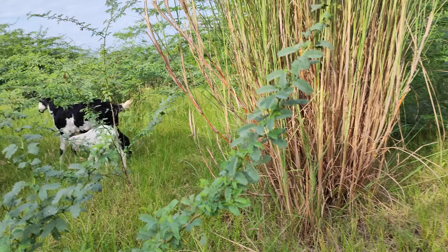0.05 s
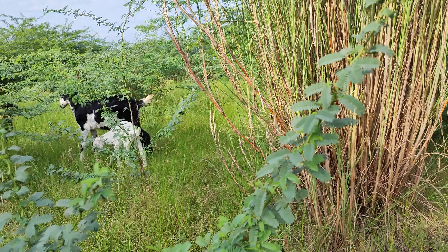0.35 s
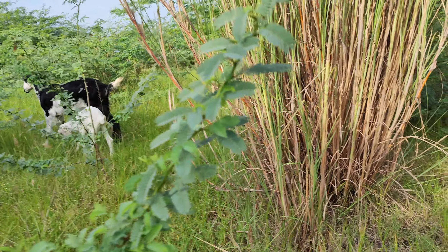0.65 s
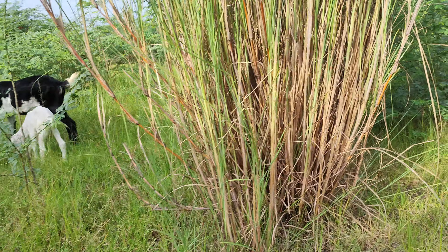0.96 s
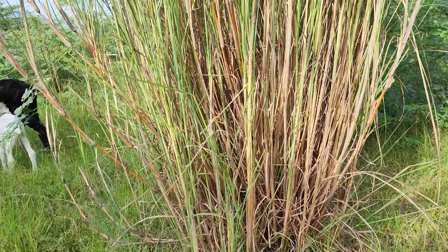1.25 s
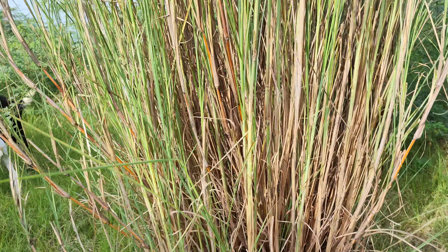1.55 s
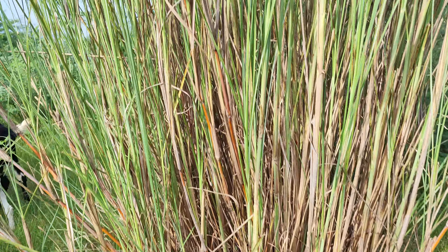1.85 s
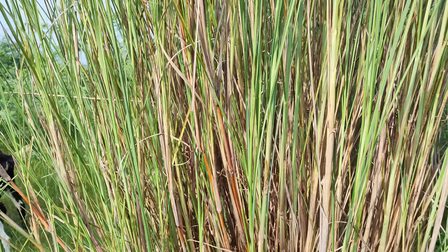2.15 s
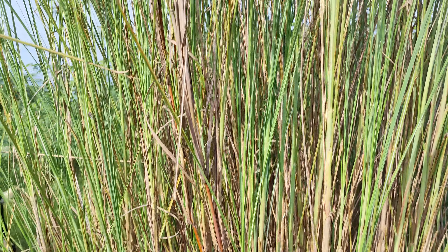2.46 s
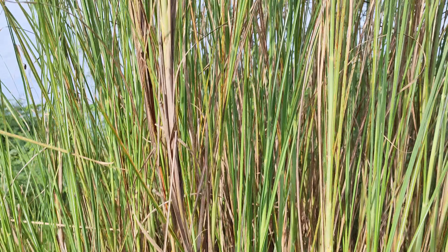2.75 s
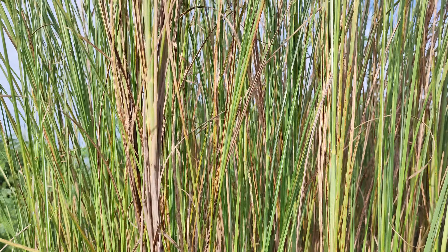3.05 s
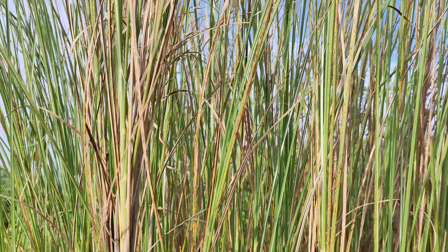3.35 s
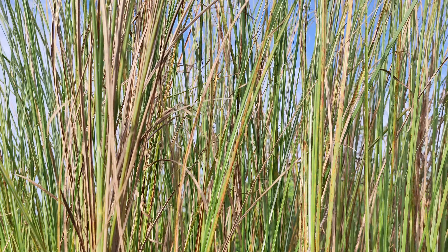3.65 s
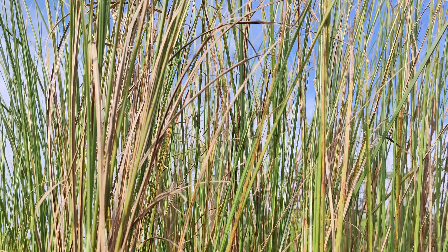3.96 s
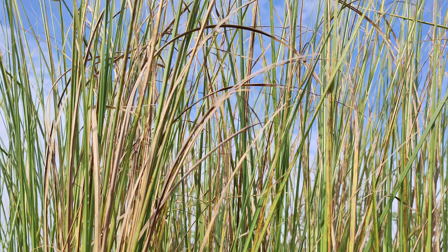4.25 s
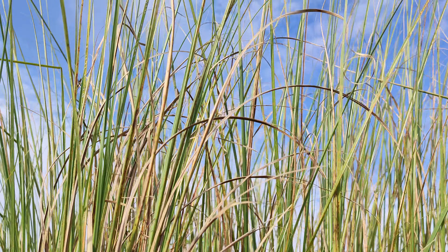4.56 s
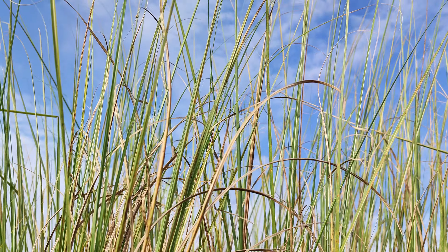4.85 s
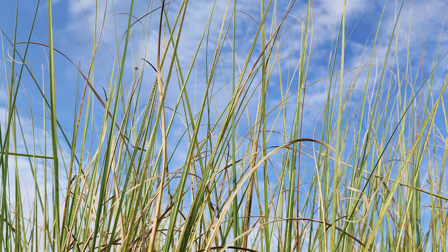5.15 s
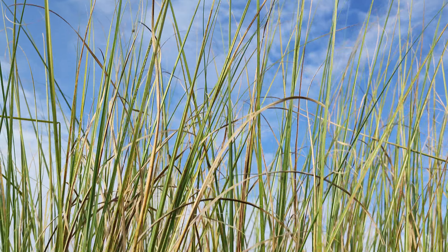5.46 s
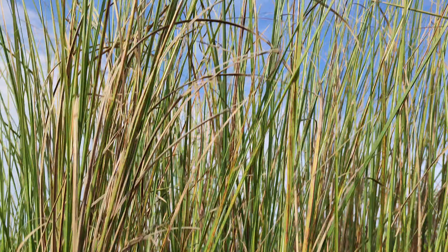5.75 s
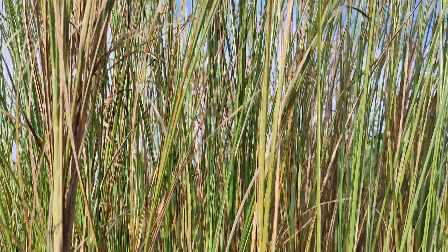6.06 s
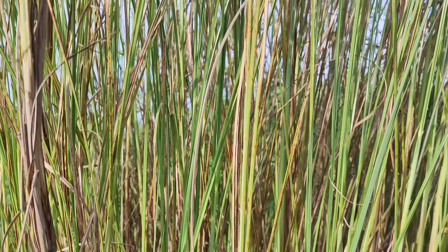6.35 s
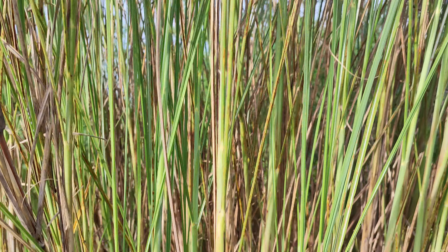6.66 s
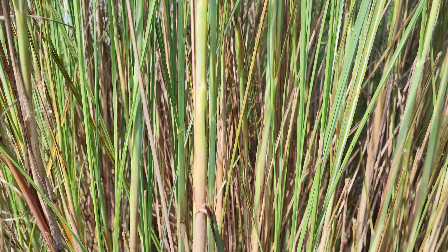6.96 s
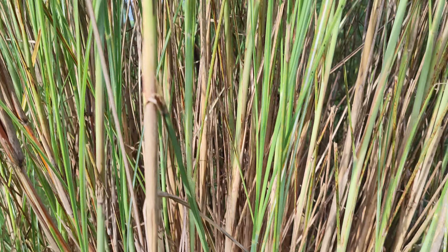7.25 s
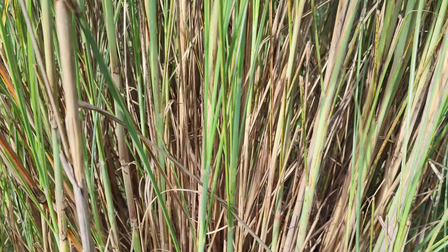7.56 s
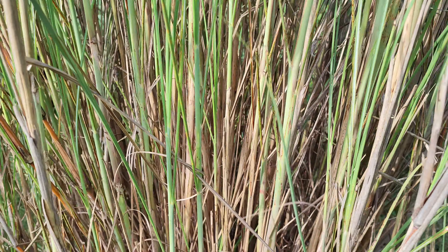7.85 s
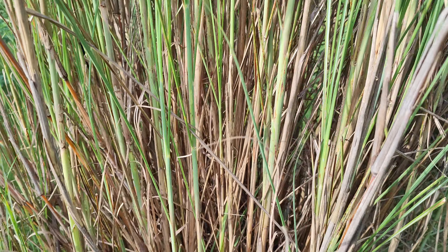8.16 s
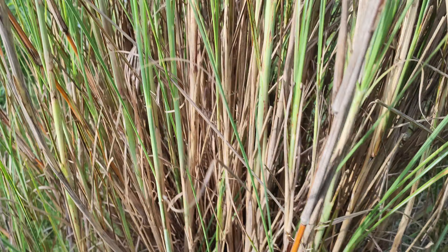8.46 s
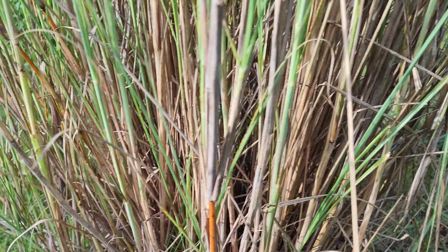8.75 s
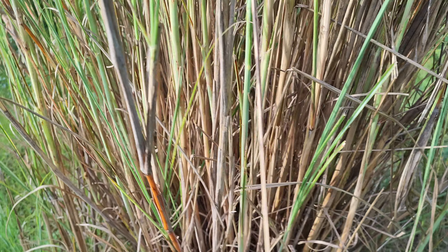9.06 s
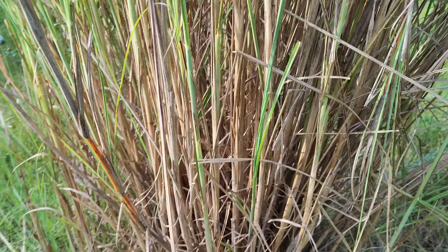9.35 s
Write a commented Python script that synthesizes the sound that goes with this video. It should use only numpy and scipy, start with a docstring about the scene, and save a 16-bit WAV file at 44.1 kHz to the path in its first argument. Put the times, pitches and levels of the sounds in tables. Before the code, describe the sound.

Crickets chirp over a high insect hiss and distant birds as steps swish through tall grass, with one loud bump on the microphone.

```python
"""A slow walk round a clump of tall grass in a field, microphone in hand. From the start, crickets chirp
with their wings over a far insect chorus, distant birds and a low rumble of air. For two seconds or so,
steps swish through the grass and snap dry stalks. Near 3 s a bird sings a climbing row of notes. At 4.6 s
a hand bumps the microphone's case hard enough to overload it. From 6.5 s the steps return, and just
after 7 s the hand bumps the case again, more lightly."""
import sys
import numpy as np
from scipy import signal
from scipy.fft import rfft, irfft, next_fast_len
from scipy.io import wavfile

SR = 44100
rng = np.random.default_rng(int(sys.argv[2]) if len(sys.argv) > 2 else 0)


def unload_wav(signal):
    """Save mono or channel-first audio to the path in sys.argv[1] as 16-bit WAV at rate SR, clipped to [-1, 1]."""
    wavfile.write(
        sys.argv[1],
        SR,
        np.round(np.clip(np.atleast_2d(signal).T, -1, 1) * 32767).astype(np.int16),
    )


N = 423801
TIME = np.arange(N) / SR

# Strides through the grass: peak t/s, length/s, swish level/dB, straw level/dB (before straw_gain_db)
STRIDES = [(0.605, 0.05, -58.5, -80), (0.727, 0.083, -52.5, -60.5), (0.92, 0.074, -63, -70),
           (1.325, 0.064, -56.5, -66.5), (1.422, 0.057, -50.5, -63.5), (1.893, 0.27, -71, -76),
           (2.239, 0.054, -58, -65), (6.527, 0.13, -68, -75.5), (7.5, 0.078, -62, -66.5),
           (8.059, 0.096, -73, -74.5), (8.318, 0.026, -58.5, -79), (8.518, 0.13, -60.5, -67),
           (8.8, 0.068, -72, -71), (9.172, 0.079, -60.5, -63.5), (9.457, 0.19, -65.5, -73.5)]
# Tone of soft blades swishing: f/Hz, level/dB
SWISH_TONE = [(200, -8.5), (450, -10), (800, -7), (1250, -5.5), (1700, 1.5), (2100, 1), (3000, -5),
              (5000, -28)]
# Tone of dry straw crackling: f/Hz, level/dB
STRAW_TONE = [(1500, -28), (2600, -8.5), (3800, -0.5), (4800, -0.5), (7500, -6)]
# Narrow resonances (ringing tones) in the rustle, one for each pitch in resonance_hz: level/dB
RESONANCE_LEVELS = (-44.5, -29.5, -37, -39.5)


def steps(straw_gain_db=11, tick_db=-12.5, resonance_hz=(1450, 1734, 2680, 3850), ring_s=0.0057):
    """Each step swells and dies away, brushing soft blades and crushing dry straw."""
    swish_power, straw_power = np.zeros((2, N))
    for s, length, swish_db, straw_db in STRIDES:
        rise_s, fall_s = 1.12 * length, 0.96 * length
        from_peak = np.maximum((s - TIME) / rise_s, (TIME - s) / fall_s)
        swell = np.exp(-np.minimum(from_peak, 10) ** 1.2)
        swish_power += (swell * from_db(swish_db)) ** 2   # overlapping rustles add in power
        straw_power += (swell * from_db(straw_db + straw_gain_db)) ** 2
    swish = wide_noise(SWISH_TONE, grain_db=3)
    straw = wide_noise(STRAW_TONE, grain_db=1) + from_db(tick_db) * fibre_ticks()
    rustle = np.sqrt(swish_power) * swish + np.sqrt(straw_power) * straw
    # narrow resonances colour the rustle, the strongest near 1.7 kHz
    resonances = sum(from_db(db) * ring(rustle, hz, ring_s) * (1 + 0.61 * drift(13))
                     for hz, db in zip(resonance_hz, RESONANCE_LEVELS))
    flutter = from_db(1.4 * drift(90))
    return (rustle + resonances) * pan(-0.8) * flutter


def fibre_ticks(per_s=220, spread_db=3):
    """Single dry fibres give way in tiny clicks of uneven size, each from its own side."""
    breaks = rng.random(N) < per_s / SR
    sizes = from_db(spread_db * np.minimum(rng.exponential(1, N), 3))
    clicks = breaks * sizes * pan(4 * rng.standard_normal(N))
    return rms_one(ring(clicks, 2400, 0.0011) - ring(clicks, 4730, 0.00065))


# Dry stalks breaking: t/s, relative level/dB, ring f/Hz, left over right/dB
STALK_BREAKS = [(0.568, -36, 1650, -1.5), (.718, -36, 3750, -9), (.855, -29, 3070, -1),
                (1.263, -31, 3200, -1), (1.419, -36, 1630, -2), (2.091, -39, 5500, -2),
                (3.165, -47, 3780, 6), (3.2435, -44, 4100, 8), (7.1824, -31, 3750, -2),
                (7.859, -47.5, 2427, 0), (9.222, -35.5, 7020, 1)]


def stalk_snaps(crack_s=0.0022, ring_s=0.0065, crack_db=-11.5, ring_db=-22, splinter_db=-0.5):
    """A stalk cracks, then its last fibres splinter; both bursts ring briefly in the hollow stem."""
    out, t = np.zeros((2, N)), TIME[:SR // 40]
    for s, db, hz, side_db in STALK_BREAKS:
        splinter_s = 0.0055 * (.5 + rng.random())
        for late_s, weaker_db in ((0, 0), (splinter_s, splinter_db)):
            burst = rng.standard_normal(len(t)) * np.exp(-t / crack_s)
            snap = from_db(crack_db) * burst + from_db(ring_db) * ring(burst, hz, ring_s)
            add(out, s + late_s, from_db(db + weaker_db) * pan(side_db) * snap)
    return scatter(cut_bass(out, hz=1200, order=2), fade_s=.06, echo_db=-5)


# A hand knocking the case: t/s, force level/dB, left over right/dB, f/Hz above which the knock is dulled
KNOCKS = [(4.593, -45, 4, 1000), (4.6157, -16.5, 2, 1810), (4.6315, -1, -2, 3977), (4.655, -49, 0.5, 995),
          (7.1415, -51, 2, 3000), (7.153, -58, 2, 1200), (7.181, -30.5, -14, 7000),
          (7.1853, -29.5, 10, 1200), (7.223, -40, 4.5, 2200), (7.236, -43.5, 0, 1200)]


def hand_bumps(grit_db=-27, grit_s=0.003245, rub_db=-41, rub_rise_db_per_s=521, rub_fall_db_per_s=370.5):
    """A finger slides in, touches, knocks and slides off; light knocks are grittier than hard ones."""
    force, rub_level, t = np.zeros((2, N)), np.zeros(N), TIME[:SR // 80]
    for s, db, side_db, contact_hz in KNOCKS:
        blow = from_db(db - 0.5) * (t == 0)
        grit = from_db(grit_db + db / 2) * rng.standard_normal((2, len(t))) * np.exp(-t / grit_s)
        touch = from_db(-3) * soften(blow, hz=1200)
        add(force, s - .00145, pan(side_db - 6.5) * touch)   # the soft fingertip lands first
        add(force, s, pan(side_db) * soften(blow + grit, contact_hz))
        fade_db = np.maximum((s - TIME) * rub_rise_db_per_s, (TIME - s) * rub_fall_db_per_s)
        slide = from_db(rub_db + .24 * db - np.minimum(fade_db, 100))   # harder knocks rub a bit louder
        rub_level = np.maximum(rub_level, slide)
    friction = soften(rng.standard_normal(N) + rng.standard_normal((2, N)), hz=1400)
    return case_ring(force) + rub_level * rms_one(case_ring(friction))


# The case's own tones: f/Hz, level/dB, time to fade by 60 dB/s, left over right/dB
CASE_TONES = [(546, -22, 0.036, -2), (612.8, 0.5, 0.0067, 0.5), (810, -9, 0.0024, -8),
              (1098, -11.5, 0.015, 8.5), (1320, -2, 0.0038, -14), (1790, -10.5, 0.0084, 13),
              (2250, -7.5, 0.0027, -9), (3750, -10, 0.0029, 3.5), (5220, -15, 0.0025, -8),
              (6650, -22, 0.006, -10)]


def case_ring(force):
    """The small case answers with quickly dying tones, each stronger on one side, and little bass."""
    tones = sum(from_db(db) * pan(side_db) * ring(force, hz, fade_s)
                for hz, db, fade_s, side_db in CASE_TONES)
    return cut_bass(tones, hz=400, order=3)


# Runs of evenly spaced chirps: first t/s, last t/s, count, f/Hz, relative level/dB, left over right/dB
CHIRP_RUNS = [(0.254, 0.714, 2, 5860, -53, -15), (1.282, 2.086, 3, 5880, -56.5, -6),
              (2.534, 3.338, 3, 5930, -56.5, -17), (2.722, 3.178, 2, 5530, -60.5, -11),
              (3.703, 4.377, 3, 5900, -58.5, -10), (4.644, 5.272, 3, 5960, -53.5, -10.5),
              (4.921, 5.255, 2, 6750, -58.5, -17), (5.75, 6.18, 2, 6700, -60, -4),
              (5.013, 6.92, 6, 5646, -53, -2.5), (5.655, 6.329, 3, 5960, -54.5, -13),
              (7.084, 7.4, 2, 5945, -55, 0.5), (7.343, 8.17, 3, 5664, -50.5, -4.5),
              (8.61, 9.026, 2, 6140, -58, 15), (8.657, 9.519, 3, 5770, -64.5, -0.5)]


def crickets(stroke_s=0.013, pitch_fall=0.13, long_gap_s=.02, short_gap_s=0.0075, swell_db=2.5):
    """A chirp is eight wing strokes that slow down and grow louder; each stroke falls in pitch."""
    out, progress = np.zeros((2, N)), np.arange(0, 1, 1 / (stroke_s * SR))
    shape = np.sin(np.pi * progress) ** 2 / np.sqrt(3 / 16)   # scaled to an rms of 1
    near = [(s, hz, db, side_db) for first, last, count, hz, db, side_db in CHIRP_RUNS
            for s in np.linspace(first, last, round(count))]
    farther = [(TIME[-1] * when, 5700 * (.97 + 0.047 * high), -62 - 4 * far, 10 * (side - .5))
               for when, high, far, side in rng.random(size=(60, 4))]
    for s, hz, db, side_db in near + farther:
        # k counts backwards from the chirp's last stroke
        for k, (jitter, detune, accent) in enumerate(rng.standard_normal(size=(8, 3))):
            pitch = hz * (1 - pitch_fall * (progress - .5) + 0.0026 * detune - 0.0017 * k)
            level = from_db(db + 0.14 - swell_db * max(k, 1) + 0.49 * accent)
            add(out, s - stroke_s / 2, level * shape * whistle(pitch) * pan(side_db))
            gap_s = short_gap_s + (long_gap_s - short_gap_s) * 0.54 ** k
            s -= gap_s * (1 + 0.044 * jitter)
    return scatter(out, fade_s=.12, echo_db=-8)


# Single bird calls: t/s, length/s, start f/Hz, end f/Hz, level/dB (before gain_db), raspiness from 0 to 1
CALLS = [(.97, 0.13, 2730, 2830, -68, 0.5), (1.94, 0.11, 5340, 4860, -63, 0.1),
         (2.86, 0.027, 4600, 4320, -65, .3), (3.66, 0.1, 1765, 1450, -71.5, .4),
         (4.28, 0.057, 1328, 1320, -61.5, 0.26), (4.33, .03, 3293, 3100, -71.5, 0.7),
         (4.41, 0.038, 2740, 3200, -66.5, 1), (5.2, 0.031, 2400, 2540, -65.5, 1),
         (5.68, 0.1, 1049, 1414, -68.5, .4), (5.83, 0.12, 2685, 2930, -72, 0.98),
         (6.18, 0.058, 2250, 2440, -66.5, 1)]


def birds(gain_db=2.5, flock_db=-78.5, flock_hz=2400):
    """Short whistles and raspy calls over the chatter of a farther flock, blurred by distance."""
    out = np.zeros(N)
    rasp = 0.06 * drift(440) + 0.012 * drift(90)   # fast pitch wobble rasps, slower wobble warbles
    flock = [(9.9 * when, 0.062 + 0.12 * long, flock_hz * 2 ** (1.4 * high - .7),
              flock_hz * 2 ** (1.2 * high - .8 + 0.22 * rise), flock_db - 6 * far, 1)
             for when, long, high, rise, far in rng.random(size=(70, 5))]
    for s, length, start_hz, end_hz, db, raspiness in list(CALLS) + climbing_song() + flock:
        progress = np.linspace(0, 1, int(length * SR))
        wobble = rasp.take(int(s * SR) + np.arange(len(progress)), mode="wrap")
        pitch = (start_hz + (end_hz - start_hz) * progress) * (1 + raspiness * wobble)
        call = from_db(db + gain_db) * np.sin(np.pi * progress) * whistle(pitch)
        add(out, min(s, TIME[-1]), call)
    return scatter(out * pan(0), fade_s=.25, echo_db=0)


def climbing_song(start_s=2.69, every_s=.108, note_s=0.069, first_hz=2530, top_hz=3040):
    """A bird's nine notes climb and level off, each sliding up 100 Hz; gives rows like those of CALLS."""
    k = np.arange(9)
    pitches = top_hz + (first_hz - top_hz) * np.exp(-k / 3)
    return [(s, note_s, hz - 50, hz + 50, -72, 0.74) for s, hz in zip(start_s + every_s * k, pitches)]


# Rise and fall of the far insects: t/s, level/dB (before gain_db), left over right/dB
INSECT_SWELL = [(0.0, -65, -1), (0.91, -66, 0), (1.87, -62, -4.5), (2.54, -67.5, 0), (2.94, -63.5, -4.5),
                (4.39, -63, 3.5), (5.88, -59.5, -6), (6.31, -63.5, 1), (9.6, -66.5, 1.5)]
# Tone of the far insects: f/Hz, level/dB
INSECT_TONE = [(2180, -64.5), (3700, -35.5), (4140, -21), (4710, -5), (5220, -6), (5700, -0.5),
               (6110, -5.5), (6370, -10), (6890, -11), (7300, -17), (7610, -16.5), (9890, -52.5),
               (16700, -120)]


def insect_chorus(gain_db=1.47, shimmer_db=0.6):
    """Countless far insects merge into a high, shimmering hiss."""
    times, *columns = np.transpose(INSECT_SWELL)
    db, side_db = [np.interp(TIME, times, column) for column in columns]
    hiss = wide_noise(INSECT_TONE, grain_db=-1.2)
    return hiss * pan(side_db) * from_db(db + gain_db + shimmer_db * drift(63))


# Tone of the open air: f/Hz, level/dB
AIR_TONE = [(20, -14.5), (45, 1.5), (70, -1.5), (120, -7.5), (250, -13.5), (400, -13.5), (540, -21.5),
            (1100, -26), (2200, -29), (3600, -32), (8000, -35)]


def air(level_db=-64, waver_db=0.49):
    """The air over the field is a faint, low rumble that wavers a little."""
    return from_db(level_db) * wide_noise(AIR_TONE) * from_db(waver_db * drift(12))


# How alike the two ears hear sound from all round: f/Hz, likeness from 0 to 1
EAR_LIKENESS = [(60, 0.98), (200, 0.82), (400, 0.28), (800, 0.33), (2000, .25), (7000, .1)]


def wide_noise(tone, grain_db=0):
    """Noise from all round, alike at both ears in the bass; uneven grains make it crackle."""
    size = next_fast_len(N)
    hz = np.arange(size // 2 + 1) * SR / size
    grain_sizes = np.minimum(rng.exponential(1, N // 32 + 1), 5)
    grains = from_db(grain_db * np.repeat(grain_sizes, 32)[:N])
    middle, side = rfft(rng.standard_normal((2, N)) * grains, size)
    alike = np.clip(at_hz(EAR_LIKENESS, hz), 0, 1)
    ears = np.sqrt(1 + alike) * middle + np.sqrt(1 - alike) * side * [[1], [-1]]
    return rms_one(irfft(ears * from_db(at_hz(tone, hz)), size)[:, :N])


def scatter(x, fade_s, echo_db):
    """Stalks and bushes throw back many faint echoes, different at each ear."""
    t = TIME[:SR // 2]
    echoes = rng.standard_normal((2, len(t))) * from_db(-60 * t / fade_s)
    echoes /= np.sqrt(np.sum(echoes ** 2, axis=1, keepdims=True))
    gain = from_db(echo_db)
    return (x + gain * signal.oaconvolve(x, echoes, axes=1)[:, :N]) / np.sqrt(1 + gain ** 2)


def ring(x, hz, fade_s):
    """Each click in x starts a tone that drops 60 dB in fade_s."""
    decay, turn = from_db(-60 / (fade_s * SR)), 2 * np.pi * hz / SR
    return signal.lfilter([0, np.sin(turn)], [1, -2 * decay * np.cos(turn), decay ** 2], x + 1e-18)


def whistle(hz):
    """A pure tone that follows a changing pitch."""
    return np.sin(2 * np.pi * np.cumsum(hz) / SR)


def soften(x, hz):
    """Gently dull the sound above hz."""
    decay = np.exp(-2 * np.pi * hz / SR)
    return signal.lfilter([1 - decay], [1, -decay], x + 1e-18)


def cut_bass(x, hz, order):
    """Thin out the sound below hz; a higher order cuts more steeply."""
    return signal.sosfilt(signal.butter(order, hz, "high", fs=SR, output="sos"), x + 1e-18)


def drift(per_s):
    """A random wobble of typical size 1 that takes per_s turns a second."""
    points = rng.standard_normal(8000)
    return rms_one(np.interp(TIME * per_s, np.arange(len(points)), points))


def at_hz(table, hz):
    """Read between a table's rows, giving each octave equal room."""
    f, value = np.transpose(table)
    return np.interp(np.log(hz + 1e-9), np.log(f), value)


def pan(side_db):
    """Left and right gains with steady total power; plus is to the left."""
    gains = from_db(np.array([[1], [-1]]) * side_db / 2)
    return gains / np.sqrt(np.mean(gains ** 2, axis=0))


def add(out, s, sound):
    """Mix a sound in at s seconds."""
    i = max(round(s * SR), 0)
    out[..., i:i + sound.shape[-1]] += sound[..., :N - i]


def from_db(db):
    """Turn decibels into a number to multiply by."""
    return 10 ** (np.asarray(db) / 20)


def rms_one(x):
    """Scale a sound so that its average strength (rms) is 1."""
    return x / np.sqrt(np.mean(x ** 2) + 1e-20)


def scene():
    """The field, the walker and the hand on the microphone."""
    return air() + insect_chorus() + crickets() + birds() + steps() + stalk_snaps() + hand_bumps()


def record(dry, hiss_db=-92, treble_top_hz=8450, final_top_hz=15750):
    """The sound loses its highest treble and carries a faint, even hiss; the hardest knock clips."""
    narrow = signal.sosfilt(signal.cheby2(16, 60, treble_top_hz, fs=SR, output="sos"), dry)
    clipped = np.clip(narrow + from_db(hiss_db) * rng.standard_normal((2, N)), -1, 1)
    return signal.sosfilt(signal.ellip(10, .1, 70, final_top_hz, fs=SR, output="sos"), .97 * clipped)


dry = scene()
out = record(dry)
unload_wav(out)
```